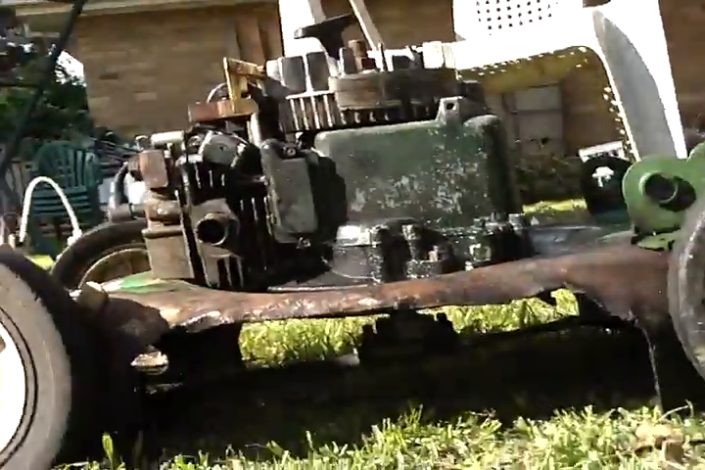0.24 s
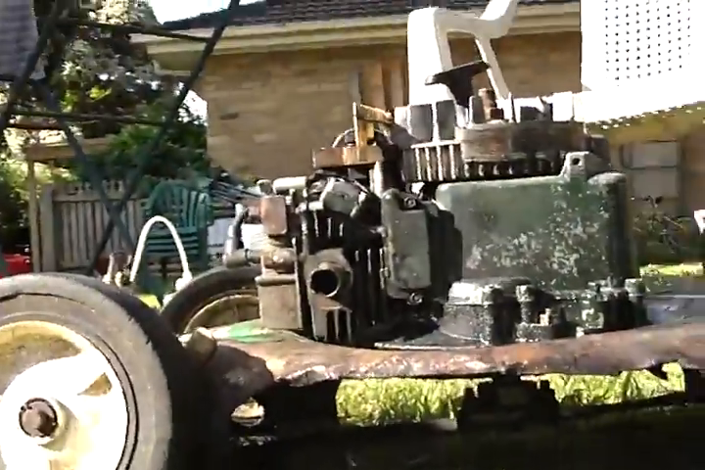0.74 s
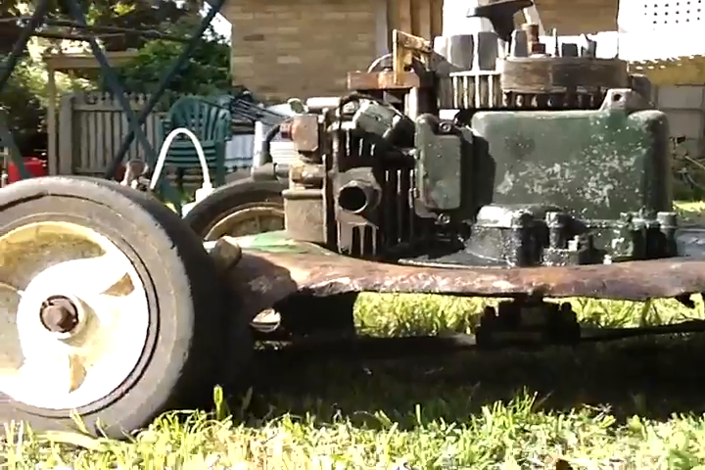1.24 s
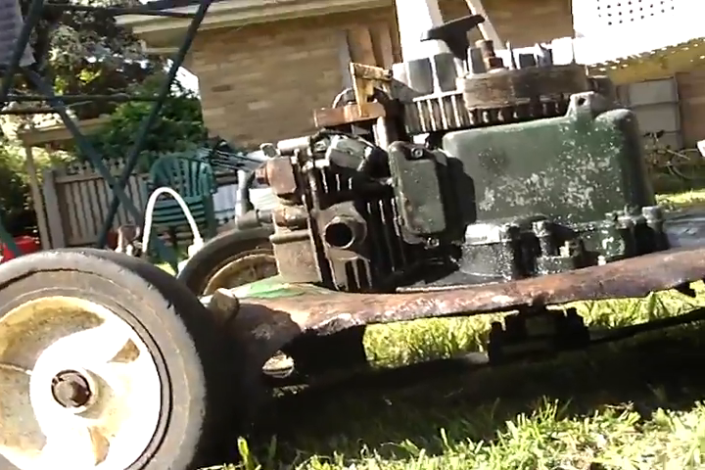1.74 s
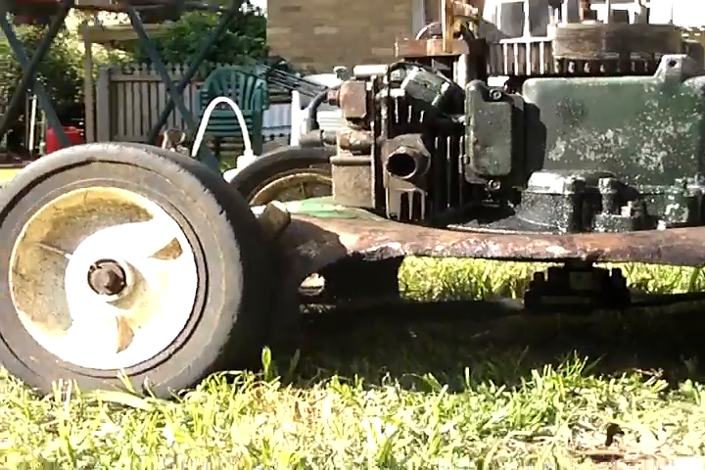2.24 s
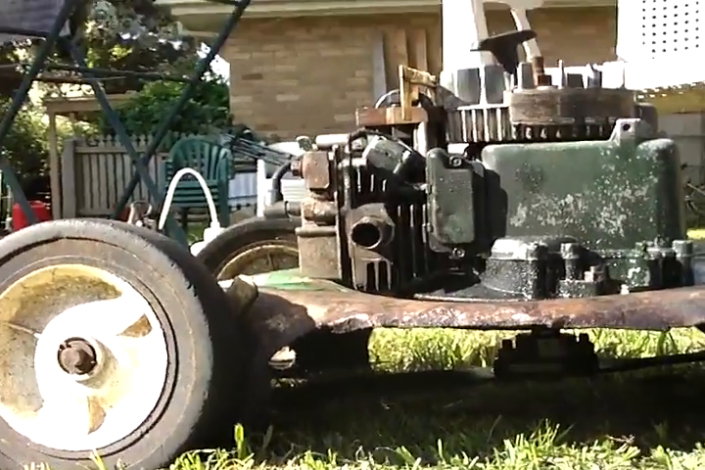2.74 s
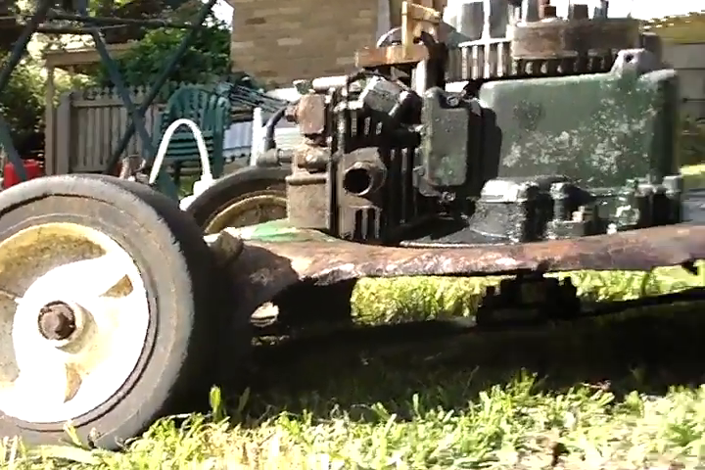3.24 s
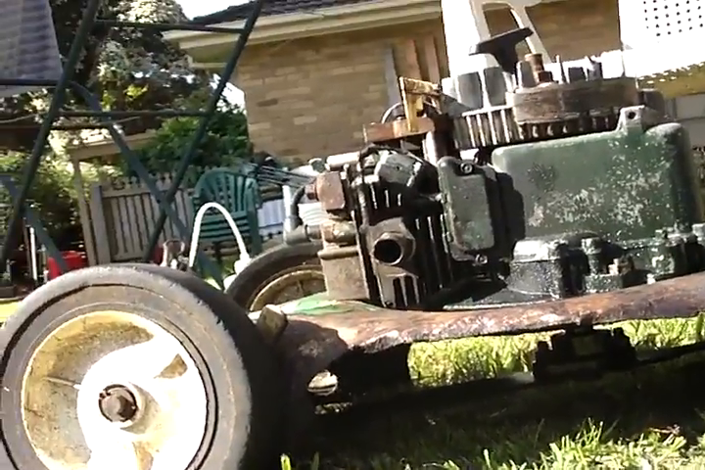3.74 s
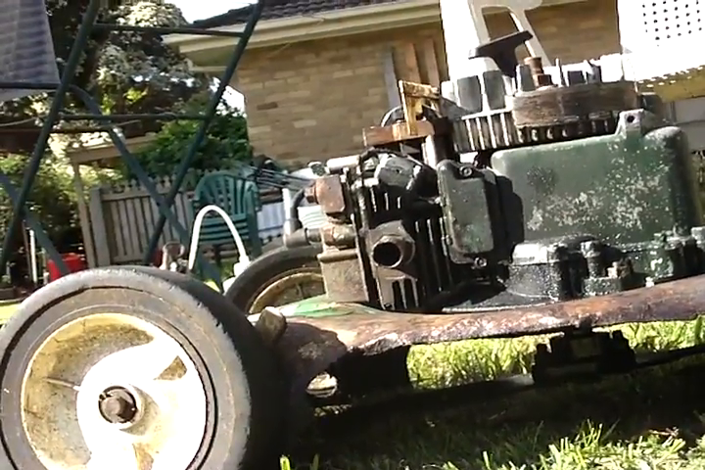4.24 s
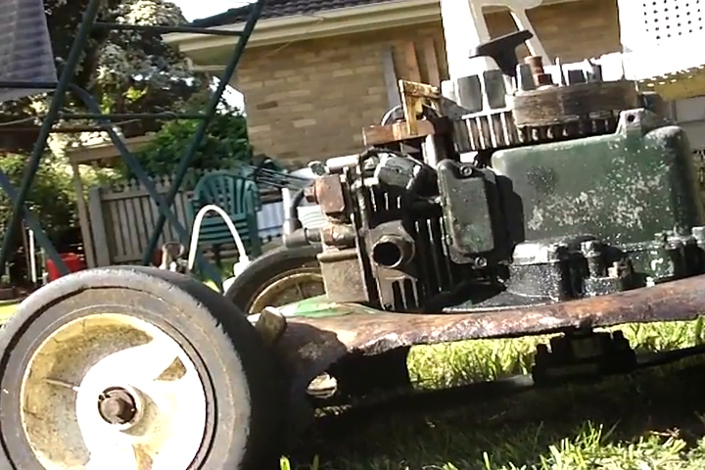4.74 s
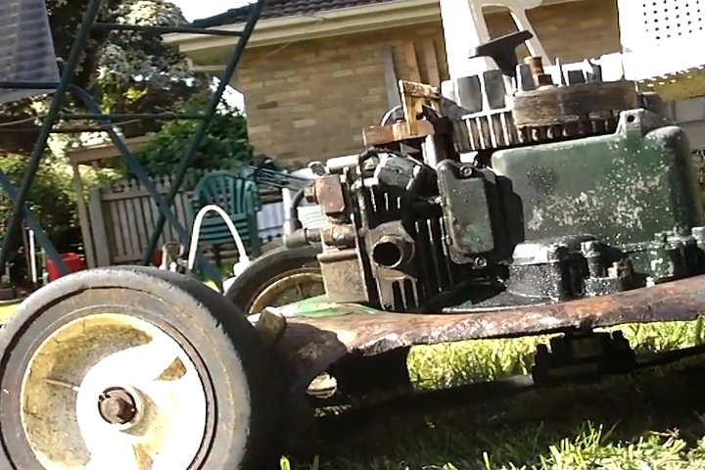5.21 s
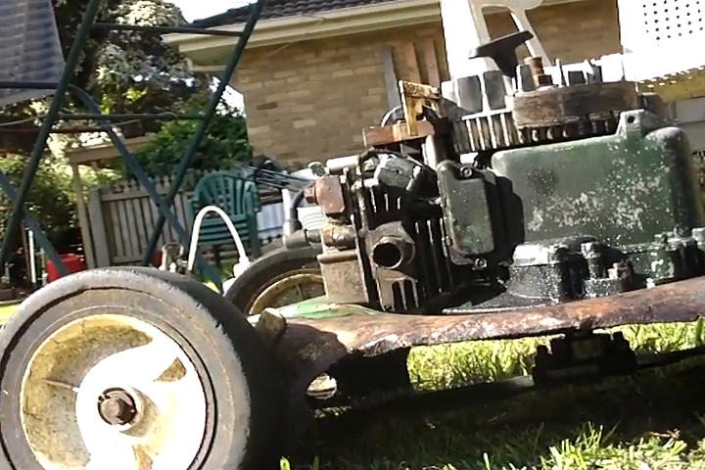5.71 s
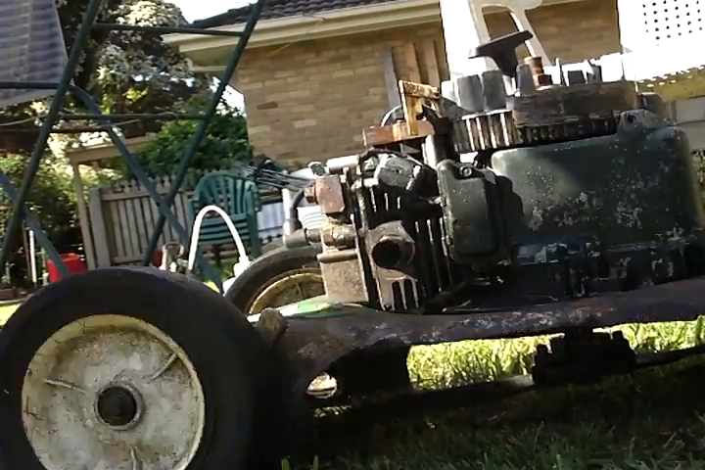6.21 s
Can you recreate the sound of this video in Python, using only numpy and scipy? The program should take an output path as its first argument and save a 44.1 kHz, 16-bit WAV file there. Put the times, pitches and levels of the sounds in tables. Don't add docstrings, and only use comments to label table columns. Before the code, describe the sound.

A hard hollow knock on the microphone, then a distant engine drone, soft wind, bird whistles and plastic ticks, ending in close rustling, snaps and thuds.

```python
import sys
import numpy as np
from scipy import signal
from scipy.fft import rfft, irfft, next_fast_len
from scipy.io import wavfile
from scipy.ndimage import uniform_filter1d, minimum_filter1d

SR = 44100
rng = np.random.default_rng(int(sys.argv[2]) if len(sys.argv) > 2 else 0)


def unload_audio(sound):
    columns = np.transpose(np.atleast_2d(sound))
    steps = np.round(np.clip(columns, -1, 1) * 32767)
    wavfile.write(sys.argv[1], SR, steps.astype(np.int16))


def gain_from_db(level_db):
    decades = np.asarray(level_db, float) / 20
    return 10 ** decades


N = 285327


def evened(x):
    return x / np.sqrt(np.mean(x ** 2) + 1e-20)


def curves(rows):
    s, *columns = np.transpose(rows)
    return [np.interp(np.arange(N) / SR, s, c) for c in columns]


def coloured(x, points):
    f, db = np.transpose(points)
    hz = np.fft.rfftfreq(len(x), 1 / SR) + 1
    gain = gain_from_db(np.interp(np.log(hz), np.log(f), db, right=-90))
    return evened(irfft(rfft(x) * gain, len(x)))


def band_passed(x, lo_hz, hi_hz, order):
    return signal.sosfilt(signal.butter(order, [lo_hz, hi_hz], "band", fs=SR, output="sos"), x)


def band_even(x, lo_hz, hi_hz):
    return x / np.std(band_passed(x, lo_hz, hi_hz, 4))


def slow(rate_hz):
    size = next_fast_len(N)
    lowpass = 1 + (np.fft.rfftfreq(size, 1 / SR) / rate_hz) ** 4
    return evened(irfft(rfft(rng.standard_normal(size)) / lowpass, size)[:N])


def bump(s, length):
    return np.exp(-((np.arange(N) / SR - s) / max(length, .02)) ** 2)


def crackly(share, size):
    heights = gain_from_db(5.5 * np.minimum(rng.exponential(1, size), 3))
    grains = heights * (rng.random(size) < 500 / SR)
    bursts = evened(signal.lfilter([1], [1, -.975], grains))
    return rng.standard_normal(size) * (1 - share + share * bursts)


def mottled(x, patchy_db):
    z = signal.stft(x, nperseg=512)[2]
    patches = uniform_filter1d(rng.standard_normal(z.shape), size=4, axis=0)
    patches = uniform_filter1d(patches, size=8, axis=1)
    return evened(signal.istft(z * gain_from_db(patchy_db * evened(patches)), nperseg=512)[1][:N])


def add(mix, s, sound):
    part = mix[round(s * SR):][:len(sound)]
    part += sound[:len(part)]


def drone():
    # (time [s], lift [dB])
    nearing = [
        (0.0, -1.5),
        (3.9, -0.5),
        (4.8, 7),
        (5.7, 8),
        (6.47, 12.5),
    ]
    # (order, level [dB], share of the lift)
    low_orders = [(1, -48, 0.92), (1.5, -65, .3), (2, -47, 0.11), (2.5, -81, .1), (3, -59.5, .7),
                  (4, -61, 0.038)]
    # (order, level [dB])
    high_orders = [(5, -28), (6, -6), (8, -23)]
    # (time [s], length [s], change [dB])
    air_swells = [
        [(2.45, 0.3, -4), (3.9, 0.088, -9), (5.3, 0.039, 1.5)],
        [(.4, 0.25, 5), (2.2, .3, 1.5)],
        [(.45, 0.4, 6), (0.948, 0.15, -10), (1.5, .12, -5.5), (2.448, 0.2, -4.5), (3.349, .4, 4),
         (4.904, 0.29, 6), (5.6, 0.22, 1.5)],
        [(1.8, 0.3, 6.5)],
        [(.1, 0.26, 14.5), (0.753, 0.14, 11), (1.1, 0.084, -3), (1.698, 0.17, -6.5), (2.505, 0.16, 4),
         (2.9, 0.13, -13), (3.443, .15, 5), (4.096, 0.12, -20), (4.5, 0.24, -14.5)],
        [(.7, .3, 5.5), (2.497, 0.54, -10.5), (3.457, 0.44, 8), (4.103, 0.11, -3.5), (5.5, .2, 5)],
    ]
    start_hz, sag_hz_per_s, hunt_hz = 79.07, .39, 0.22
    hz = start_hz - sag_hz_per_s * np.arange(N) / SR + hunt_hz * slow(2.0)
    turn = 2 * np.pi * np.cumsum(hz) / SR
    lift_db = curves(nearing)[0]

    orders = []
    for (k, db, share), swells in zip(low_orders, air_swells):
        swell_db = sum(up_db * bump(s, length) for s, length, up_db in swells)
        orders.append((k, db + share * lift_db + swell_db))
    upper_db = orders[-1][1] * 0.36 - 43 - 9 * bump(4.27, 0.22)
    orders += [(k, upper_db + db) for k, db in high_orders]

    total = np.zeros(N)
    for k, db in orders:
        lag = .12 * k * slow(1.5) - np.pi / 2 * (k - 1)
        level = np.sqrt(2) * gain_from_db(db + 0.4 * k ** 1.1 * slow(2.3))
        total += level * np.cos(k * turn + lag)
    return total


def far_hum():
    # (frequency [Hz], level [dB])
    lines = [(250, -68), (333, -67)]
    t = np.arange(N) / SR
    return sum(gain_from_db(db + 4.0 * slow(1.5)) * np.sin(2 * np.pi * hz * t + .6 * slow(2.5)) for hz, db in lines)


def wind():
    # (frequency [Hz], level [dB])
    wind_colour = [(8, -7.5), (20, 0), (45, -2.5), (70, -5.5), (120, -15), (200, -22), (400, -34),
                   (900, -59.5)]
    # (peak time [s], length [s], level [dB])
    gusts = [(0.109, 0.059, -34), (0.448, 0.83, -50), (1.25, .2, -53), (1.7, 0.22, -52.5),
             (2.128, 0.22, -49), (2.595, 0.052, -43), (3.294, 0.13, -48), (3.508, 0.17, -48),
             (4.38, 0.15, -43), (4.61, 0.45, -45), (4.917, .15, -42), (5.41, 0.15, -39),
             (5.578, 0.15, -46.5), (6.01, 0.05, -38.5), (6.25, .08, -43)]
    lumps = coloured(rng.standard_normal(N), wind_colour) * gain_from_db(2.6 * slow(12))
    breeze = gain_from_db(-54.5 + 0.78 * np.arange(N) / SR)
    gust_power = sum((gain_from_db(db) * bump(s, length)) ** 2 for s, length, db in gusts)
    return np.sqrt(breeze ** 2 + gust_power) * band_even(lumps, 12, 62)


def air():
    # (time [s], level [dB])
    rustle = [(0.0, -60), (.35, -62), (1.75, -69.5), (2.22, -65.5), (2.38, -71.5), (2.8, -66), (3.2, -70),
              (3.5, -67), (4.1, -72), (4.85, -64), (5.2, -59.5), (5.44, -56), (5.66, -57), (5.86, -55),
              (6.13, -52), (6.33, -62), (6.42, -70), (6.47, -62)]
    # (frequency [Hz], level [dB])
    dull_colour = [(90, 0.5), (250, 1.5), (450, -4), (1050, -9.5), (1300, -7), (1900, -12), (2800, -18),
                   (5000, -53)]
    # (frequency [Hz], level [dB])
    bright_colour = [(600, -10), (1500, -10.5), (2500, -2), (4200, -4.5), (6400, -18), (7400, -31)]
    bright_db = curves(rustle)[0]
    hum_db = -61 + 5.5 * np.exp(-np.arange(N) / SR / 0.51)
    dull_db = hum_db + .5 * (bright_db + 69.5)
    share = np.clip((bright_db + 75) / 60, 0, .6)
    dull = band_even(coloured(mottled(crackly(share, N), 2.5), dull_colour), 600, 2000)
    bright = band_even(coloured(crackly(share, N), bright_colour), 2800, 6500)
    return gain_from_db(dull_db - 1.87 + 1.0 * slow(20)) * dull + gain_from_db(bright_db - 5.0 + 1.7 * slow(12)) * bright


def creak(length, db, hz):
    width = 0.052
    fuzz = signal.lfilter(*signal.iirpeak(hz, 1 / width, SR), crackly(0.22, size=18000))
    swell = signal.windows.tukey(round(length * SR), .7)
    return gain_from_db(db) * swell * evened(fuzz)[:len(swell)]


def knock():
    # (time [s], height [full scale], length [s], crack [dB])
    blows = [
        (0.0686, .1, 0.003, -2),
        (0.0692, 1.2, 0.0050, 3),
        (0.0725, -0.08, 0.005, -14),
        (0.0750, -0.22, 0.012, -18),
        (.078, -.03, .004, -10),
        (0.0865, 0.3, 0.0075, -30),
        (0.0945, 0.05, 0.0026, -22),
        (.096, -.08, .009, -28),
        (.103, 0.07, 0.008, -32),
        (.110, -.05, .007, -30),
    ]
    # (frequency [Hz], decay to -60 dB [s], level [dB])
    casing = [(1350, 0.006, -19), (2350, 0.0089, -33), (835, 0.007, -24), (4000, 0.0064, -44)]
    push, strike, t = np.zeros(N), np.zeros(N), np.arange(3000) / SR
    for s, height, length, crack_db in blows:
        hump = np.hanning(round(length * SR))
        grit = uniform_filter1d(rng.standard_normal(600), 6)[:len(hump)]
        add(push, s, height * hump)
        add(strike, s, gain_from_db(crack_db) * hump ** 1.5 * grit)
    vent = signal.butter(2, 17, "high", fs=SR, output="sos")
    swing = signal.sosfilt(vent, push)
    rings = sum(gain_from_db(db - 60 * t / t60) * np.sin(2 * np.pi * hz * t) for hz, t60, db in casing)
    loud = swing + .5 * signal.oaconvolve(strike, rings)[:N]
    return loud / (1 + abs(loud / .95) ** 4) ** .25


def brush(length, db, low_hz):
    slope = [(low_hz * 0.057, -18), (low_hz, 0), (max(low_hz * 2.05, 3000), -7), (7400, -26)]
    grit = coloured(crackly(0.36, size=6000), slope)
    swell = np.hanning(round(length * SR))
    return gain_from_db(db) * swell * grit[:len(swell)]


def tick(peak_db, hz, treble_db, t60=0.044):
    t = np.arange(2500) / SR
    rattle = .5 * rng.standard_normal((2, len(t))) * gain_from_db(-60 * t / max(t60, .004))
    rattle[0, 36:48] += 1.2 * np.hanning(12)
    rattle[1, 40:43] += 2.2
    rattle[:, :36] *= .1
    body = band_passed(rattle[0], hz * .5, min(hz * 1.66, 7000), 3)
    body += .8 * signal.lfilter(*signal.iirpeak(hz, 5.5, SR), body)
    crack = band_passed(rattle[1], 2400, 4800, 2)
    return gain_from_db(peak_db + 0.5) * (body / abs(body).max() + gain_from_db(treble_db + 1) * crack / abs(crack).max())


def whistle(length, from_hz, to_hz, db, slide):
    t = np.arange(0, length, 1 / SR)
    way = np.sin(np.pi / 2 * np.minimum(t / length / slide, 1))
    waver = evened(uniform_filter1d(rng.standard_normal((2, 12000)), 300))[:, :len(t)]
    hz = (from_hz + (to_hz - from_hz) * way) * (1 + 0.0051 * waver[0])
    turn = 2 * np.pi * np.cumsum(hz) / SR
    level = gain_from_db(db - 9.5 * (t / length) ** 2.1 + 2.2 * waver[1])
    return np.sqrt(2) * level * np.sin(turn) * signal.windows.tukey(len(t), .25)


def birds():
    # (time [s], length [s], from [Hz], to [Hz], level [dB])
    chips = [
        (1.385, .03, 3500, 3690, -69),
        (2.628, .05, 2750, 3900, -66),
        (2.645, .035, 3850, 3920, -66),
        (2.695, .04, 3300, 3480, -70),
        (2.838, .018, 4200, 4330, -69),
        (2.857, .016, 3650, 3600, -65),
        (2.872, .016, 3000, 3120, -63),
    ]
    # (time [s], length [s], from [Hz], to [Hz], level [dB])
    sliding = [(1.525, .2, 2080, 2620, -65), (1.705, .045, 2600, 2640, -67), (2.730, .045, 2500, 2170, -60),
               (2.750, .03, 2330, 2170, -61), (2.870, .115, 2080, 2270, -67), (2.975, .05, 2230, 2090, -63),
               (2.970, .06, 2800, 2820, -65), (2.990, .05, 2980, 3120, -67), (3.015, .055, 2150, 2340, -58),
               (3.900, .13, 3500, 2420, -72), (3.930, .05, 3050, 2750, -71), (4.225, .07, 2780, 2800, -73),
               (4.300, .07, 2980, 2750, -68), (4.850, .04, 2500, 2730, -63)]
    # (time [s], length [s], from [Hz], to [Hz], level [dB])
    held = [
        (2.020, .22, 1950, 2080, -63.5),
        (2.088, 0.15, 2070, 2395, -58.5),
        (2.22, .13, 2300, 2395, -66),
        (2.290, 0.18, 2160, 2190, -56),
        (2.420, .07, 2110, 2106, -63),
    ]
    direct = np.zeros(N)
    for table, slide in ((sliding, .85), (held, .08), (chips, .53)):
        for s, *note in table:
            add(direct, s, whistle(*note, slide))
    t = np.arange(9000) / SR
    echoes = evened(rng.standard_normal(len(t)) * gain_from_db(-60 * t / 0.14)) / np.sqrt(len(t))
    return 1.18 * direct + 0.63 * signal.oaconvolve(direct, echoes)[:N]


def thud(peak_db, hz, t60):
    t = np.arange(4000) / SR
    onset = 1 - np.exp(-t / 0.00033)
    return 0.82 * gain_from_db(peak_db - 60 * t / max(t60, .01)) * onset * np.sin(2 * np.pi * hz * t)


def snap(peak_db, hz, treble_db):
    return tick(peak_db, hz, treble_db, t60=0.022)


def scene():
    # (time [s], length [s], level [dB], frequency [Hz])
    creaks = [(0.001, 0.054, -54, 1230), (0.180, 0.17, -58.5, 1350), (1.255, 0.11, -59, 1215),
              (2.170, 0.064, -56.5, 1160), (2.310, 0.093, -57.5, 1196), (3.350, 0.36, -62.5, 704),
              (3.325, .06, -58, 1400), (3.34, .04, -63, 2900), (5.830, .09, -60, 2420),
              (6.100, .07, -64, 2390), (6.255, 0.1, -68, 4500)]
    # (time [s], length [s], level [dB], low edge [Hz])
    brushes = [(.21, 0.13, -55.5, 2470), (.43, 0.13, -56, 2500), (.84, 0.086, -60.5, 2460),
               (.94, 0.043, -65, 2490), (1.08, 0.045, -63, 2560), (3.32, 0.075, -56, 902),
               (3.725, 0.048, -60.5, 1300), (5.1, 0.049, -52.5, 1560), (5.23, 0.065, -44, 399.3),
               (5.39, 0.06, -45.5, 490), (5.515, 0.049, -51, 420), (5.58, 0.035, -44, 1190),
               (5.93, 0.07, -46, 701), (5.955, 0.06, -50, 2200), (6.02, 0.058, -43, 408),
               (6.215, 0.046, -40.5, 395), (6.25, 0.043, -53.5, 2730), (6.42, 0.051, -54, 406.4),
               (6.455, 0.049, -39, 404)]
    # (time [s], peak [dB], ring [Hz], treble [dB], some: decay to -60 dB [s])
    ticks = [(0.317, -38.5, 1030, -35), (0.331, -31, 1080, -21), (0.711, -43.5, 1390, -15),
             (0.738, -29.5, 1170, -23), (0.740, -40, 2400, -17), (.833, -44, 1300, -30),
             (.81, -45, 1350, -15), (1.2515, -30, 1160, -36), (1.5163, -21, 1370, -14, .025),
             (1.965, -38, 960, -47), (1.997, -45, 2550, -23), (2.014, -37.5, 1350, -29),
             (2.549, -40.5, 1130, -45), (2.565, -28, 1230, -48.5), (2.571, -39, 1230, -22),
             (2.605, -35, 960, -26), (3.293, -30, 1200, -30), (3.296, -34, 1150, -18),
             (3.310, -40, 2900, -20, .02), (3.743, -43, 1640, -24), (3.859, -43.5, 1526, -38),
             (4.112, -32.5, 1300, -45), (4.919, -43.5, 1210, -11)]
    # (time [s], peak [dB], ring [Hz], treble [dB], decay to -60 dB [s])
    thin_ticks = [
        (1.3762, -37, 3470, -11, 0.021),
        (1.5165, -29, 3140, -18.5, 0.02),
        (2.2005, -39, 3370, -14, 0.0046),
        (5.763, -28, 6400, -6, 0.012),
        (5.893, -45, 4250, -1, 0.013),
    ]
    # (time [s], peak [dB], frequency [Hz], decay to -60 dB [s]); negative Hz pulls first
    thuds = [(1.516, -32, 343, 0.035), (5.254, -17, 252, 0.018), (5.261, -26, -258.6, 0.03),
             (5.297, -19.5, 430, 0.012), (5.333, -39, 552, 0.04), (5.391, -18, 543, 0.014),
             (5.418, -30, -130, 0.03), (5.496, -33, 310, 0.029), (5.558, -21, 450, 0.016),
             (5.814, -31, 850, .05), (5.809, -31, 304, 0.048), (6.041, -41, 644, 0.041),
             (6.054, -31, 484, 0.039), (6.217, -42, 323.7, 0.062), (6.2305, -20, -290, 0.045),
             (6.246, -19, 280, 0.04), (6.248, -27, 780, .04), (6.2515, -20, -1700, .018),
             (6.253, -23, 700, 0.04), (6.264, -28, 200, 0.03), (6.44, -35.5, 345, 0.034),
             (6.463, -33.5, 611, 0.03)]
    # (time [s], peak [dB], ring [Hz], treble [dB])
    snaps = [(5.093, -38.5, 1340, -6), (5.258, -30.5, 745.5, -2.5), (5.272, -37, 1840, -8),
             (5.289, -40, 1800, -8), (5.297, -30, 770, -12), (5.301, -34, 2400, -10),
             (5.311, -24, 1500, -14), (5.317, -30, 890, -31), (5.39, -31.5, 816, -26),
             (5.412, -35, 756, -10), (5.426, -25, 1500, -12), (5.486, -29, 2280, -24),
             (5.494, -29, 1720, -19), (5.532, -38, 2000, -20), (5.5585, -21, 1900, -12),
             (5.592, -31, 1400, -3), (5.596, -23, 1900, -5), (5.623, -33, 3450, 0), (5.661, -42, 4500, -3),
             (5.685, -39, 1700, 2), (5.705, -38, 1690, -1.5), (5.716, -41, 1700, -2),
             (5.807, -27, 945, -15), (5.813, -20, 806, -15.5), (5.823, -36, 2500, -2),
             (5.938, -29, 2300, -4), (5.948, -30, 2200, -4), (5.959, -35, 1900, -15),
             (5.972, -26, 2150, -8), (5.983, -31.5, 1610, -27), (6.028, -36, 1750, -10),
             (6.040, -32, 969, -23), (6.057, -30, 900, -26.5), (6.068, -32, 1680, -9),
             (6.218, -34.5, 751, -4), (6.222, -34, 1900, -6), (6.230, -33, 1800, -5),
             (6.239, -31, 1930, -6), (6.2425, -26, 1900, -20), (6.247, -30, 1200, -10),
             (6.2515, -18.5, 1720, -12), (6.265, -36, 1900, -15), (6.358, -42, 901, -24)]
    mix = drone() + far_hum() + wind() + air() + knock() + birds()
    for table, source in ((creaks, creak), (brushes, brush), (ticks + thin_ticks, tick),
                          (thuds, thud), (snaps, snap)):
        for s, *how in table:
            add(mix, s, source(*how))
    return mix[None]


def low_pass(x):
    return signal.sosfilt(signal.butter(12, 7630, fs=SR, output="sos"), x)


def record(dry):
    # (frequency [Hz], threshold against the local level [dB])
    gate = [(2600, -12), (3500, -4), (4500, -1), (5600, .5), (7500, 2.5)]
    hz, _, z = signal.stft(dry[0], SR, nperseg=1536, noverlap=768)
    patch = np.repeat(np.add.reduceat(abs(z) ** 2, np.arange(0, 769, 3)), 3, 0)[:769] / 3
    local = np.exp(uniform_filter1d(np.log(patch + 1e-30), size=36, axis=0))
    threshold_db = np.interp(hz, *np.transpose(gate), left=-90)
    keep = patch > local * gain_from_db(2 * threshold_db)[:, None]
    keep |= local > 6 * minimum_filter1d(local, size=5, axis=1)
    gated = signal.istft(z * keep, SR, nperseg=1536, noverlap=768)[1][None, :N]
    lowpass = signal.firwin(255, 7420, window=("kaiser", 8), fs=SR)
    limited = signal.oaconvolve(gated, lowpass[None], "same")
    return low_pass(limited)


dry = scene()
out = record(dry)
unload_audio(out)
```